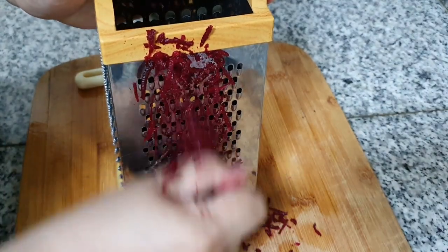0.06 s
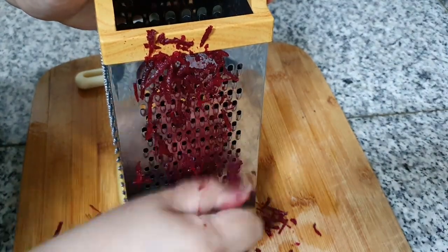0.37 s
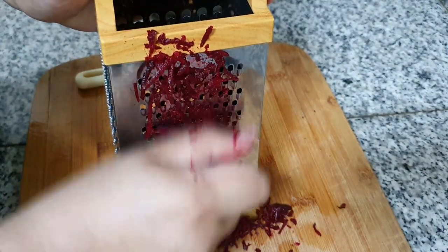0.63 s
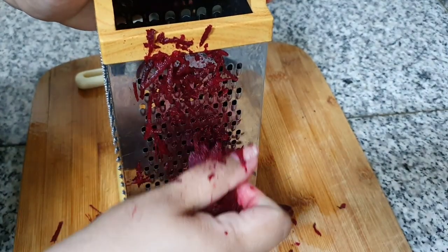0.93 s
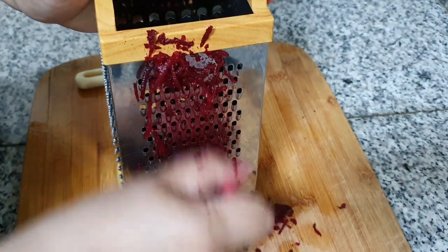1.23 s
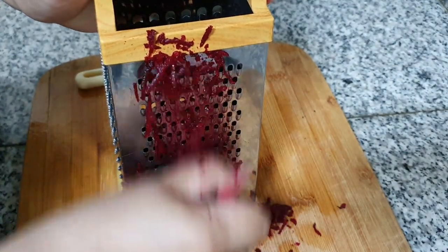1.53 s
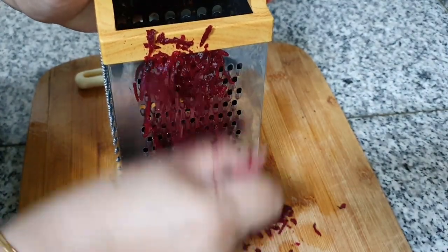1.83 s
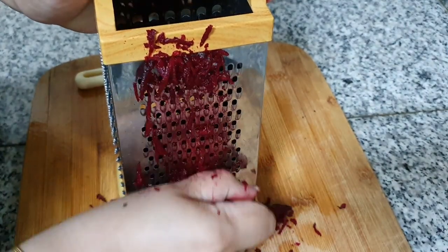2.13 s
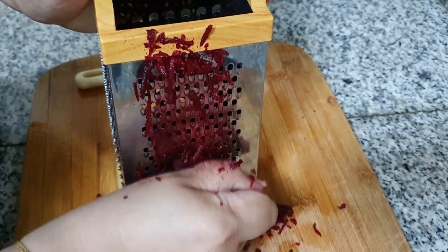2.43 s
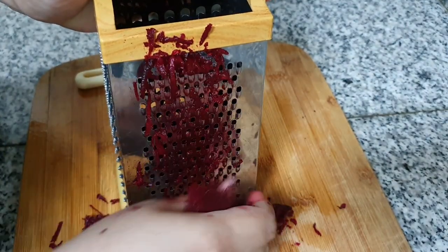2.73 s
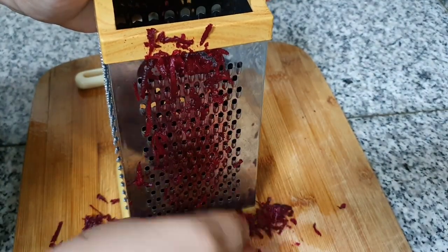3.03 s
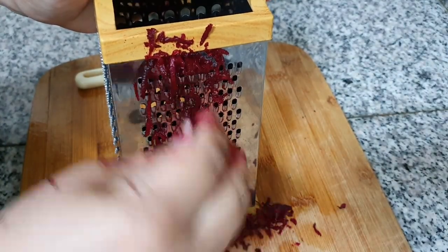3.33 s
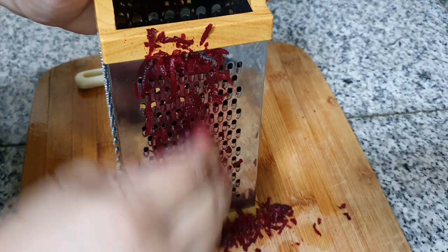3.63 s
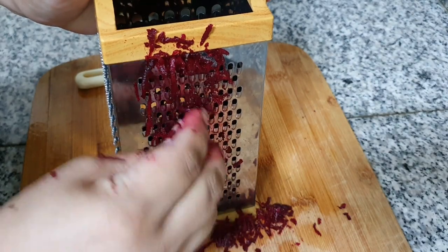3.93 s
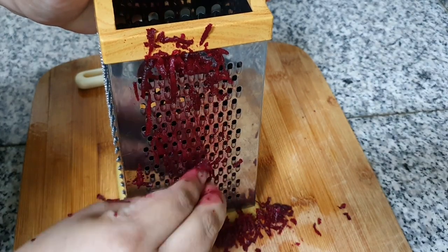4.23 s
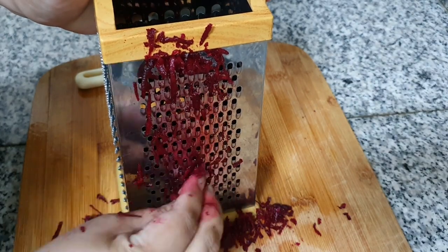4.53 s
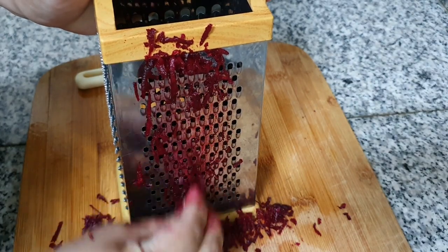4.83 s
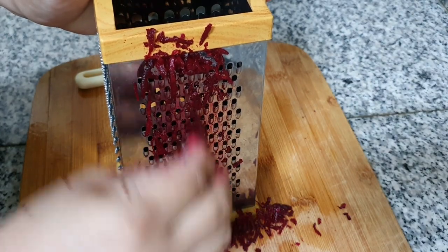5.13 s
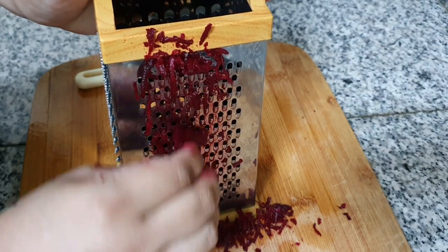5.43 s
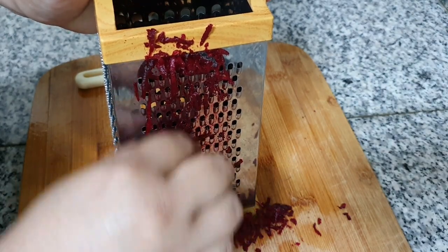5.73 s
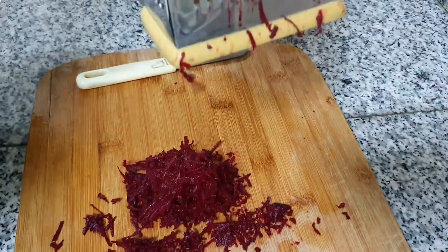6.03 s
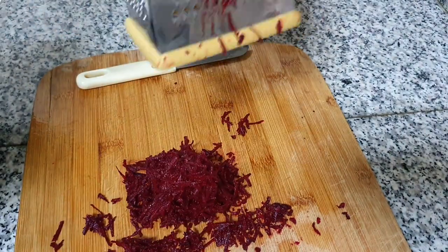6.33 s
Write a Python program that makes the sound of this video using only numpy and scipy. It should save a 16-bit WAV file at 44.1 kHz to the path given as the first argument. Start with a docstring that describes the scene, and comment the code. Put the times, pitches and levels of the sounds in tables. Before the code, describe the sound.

Close by in a small kitchen, raw beetroot is rubbed quickly over a steel box grater in four bursts with brief pauses. Each stroke rasps and crunches wetly, ringing the hollow metal and thumping the wooden board beneath. The later bursts are softer and fade out. At the end, loose shreds rustle and the rim scrapes faintly as the grater is lifted, over a faint low room rumble.

```python
"""A small kitchen, close to a two-port microphone: raw beetroot is rubbed quickly over a steel box grater
on a wooden board, in four bursts. The teeth tear the flesh in dense little bites that ring the steel
walls and the hollow box and thump the board; juice squelches in the holes. Loose shreds rustle and the
rim scrapes as the grater is lifted. The room echoes briefly and rumbles faintly behind."""
import sys
import numpy as np
from scipy import signal
from scipy.fft import rfft, irfft
from scipy.io import wavfile

SR = 44100
rng = np.random.default_rng(int(sys.argv[2]) if len(sys.argv) > 2 else 0)


def unload_wav(signal):
    """Save mono or channel-first audio to the path in sys.argv[1] as 16-bit WAV at rate SR, clipped to [-1, 1]."""
    wavfile.write(
        sys.argv[1],
        SR,
        np.round(np.clip(np.atleast_2d(signal).T, -1, 1) * 32767).astype(np.int16),
    )


N = 285321
TIME_S = np.arange(N) / SR
RING_S = np.arange(16384) / SR
SCATTER_DB = 4  # sheet scatter re direct click

# steel walls, damped by hand and pulp: f/Hz, width/Hz, level/dB, left minus right/dB, left lead/rad
WALL_MODES = [(1137, 63, 2.5, 8, 2), (1286, 49, -1, 9, .5), (1345, 17, -5.5, 8.5, 1.66),
              (1537, 11, -34.5, 13.5, 3.6), (1977, 200, -8, 17, 0.28), (2080, 91, -11.5, 7, 2.4),
              (2440, 57, -8.5, 9, 1.5), (2752, 170, -5, 1, 1.6), (4100, 150, -13, 2, 1.6)]
# dry rasp spectrum: f/Hz, level/dB
RASP_SPECTRUM = [(300, -11), (700, -3.5), (1300, 1.5), (1750, -1.5), (2300, 3), (3400, -3.5), (4500, -3),
                 (6500, -11), (9000, -40.5)]
# wet crunch spectrum: f/Hz, level/dB
CRUNCH_SPECTRUM = [(1500, -33), (3300, -3), (5200, -1), (6500, -2), (7700, -14.5), (9800, -7.5),
                   (15500, -12)]


def grating():
    """Each cut rasps, crunches and squelches; within a burst a lighter slide back follows it."""
    # cutting strokes, about ten a second: t/s, length/s, force/dB
    strokes = [(0, 0.0097, -30.5), (0.046, 0.017, -25.5), (0.134, 0.043, -27), (0.228, 0.027, -27),
               (0.322, 0.039, -25.5), (.43, 0.026, -25.5), (0.525, 0.025, -27), (.617, 0.025, -32.5),
               (1.013, 0.027, -28.5), (1.111, 0.025, -25), (1.202, 0.039, -26), (1.304, 0.035, -25.5),
               (1.407, 0.029, -24.5), (1.504, 0.032, -25), (1.599, .039, -27.5), (1.713, .027, -25),
               (1.806, 0.039, -28.5), (1.901, 0.045, -28), (2.011, .027, -26), (2.109, 0.024, -25.5),
               (2.201, 0.026, -27), (2.293, 0.042, -29.5), (2.397, 0.036, -30), (2.502, 0.023, -30),
               (2.583, 0.039, -32.5), (3.358, .023, -38.5), (3.454, 0.024, -30), (3.549, 0.029, -28.5),
               (3.642, 0.039, -29.5), (3.735, .045, -31), (3.849, 0.0181, -29), (3.941, 0.027, -34),
               (4.196, 0.0235, -35), (4.291, .044, -32.5), (4.395, 0.032, -31.5), (4.498, 0.027, -32),
               (4.592, .041, -31.5), (4.692, 0.035, -32), (4.787, 0.036, -33), (4.877, 0.04, -36),
               (4.973, 0.038, -41.5), (5.064, 0.049, -39), (5.135, 0.1, -40.5), (5.251, 0.032, -36),
               (5.317, 0.015, -47), (5.356, 0.0214, -39.5)]
    # how the hand bears on the grater: t/s, box re force/dB, board re force/dB
    bearing = [(.1, -5, -1), (.42, -13, -6.5), (.6, 2, 6), (1.02, -7, -2.5), (1.21, -4.5, 2), (1.31, -7, 3),
               (1.45, -4.5, -7), (1.6, -9, 2.5), (1.72, -5.5, -3.5), (2.1, -6, -6), (2.2, -3.5, 3),
               (2.55, -5.5, -3), (3.48, 0.5, -2.5), (3.8, -7, -0.5), (4.18, 1.5, 1), (4.34, -10, -5.5),
               (4.85, -11.5, -2.5), (5.14, -11, 10.5), (5.27, -7.5, -1)]
    start_s, length_s, force_db = np.transpose(strokes)
    bearing_s, box_db, board_db = np.transpose(bearing)
    box_db = force_db + np.interp(start_s, bearing_s, box_db)
    board_db = force_db + np.interp(start_s, bearing_s, board_db)
    # the beet is turned to a dry face, which crunches less until juice soaks through
    turn_s, soak_s, dry_db = 2.81, 0.56, -22
    dryness = (start_s > turn_s - .2) * np.exp(-np.maximum(start_s - turn_s, 0) / soak_s)
    firm_db, firm_wet_db = -27.5, -34.5
    wet_db = firm_wet_db + 0.78 * (force_db - firm_db) + dry_db * dryness
    back_db = -7 + 0.34 * (wet_db - force_db)  # juice drags on the slide back
    slides = np.diff(start_s, append=np.inf) < .15

    def force(level_db, slide_db=0):
        """Envelope of the cuts and slides back."""
        cut = pressure(start_s, length_s, level_db, rise_s=0.0054, fall_s=0.0068, arch_db=3.5)
        span_s = length_s[slides]
        back = pressure(start_s[slides] + span_s + 0.02, 0.53 * span_s + 0.012,
                        (level_db + back_db)[slides] + slide_db, rise_s=0.011, fall_s=0.01)
        return cut + back

    teeth = bites(rate_hz=2200, spread_db=1)
    wet = force(wet_db)
    walls = steel_walls(teeth * force(force_db, slide_db=-8.5), wander_db=5.5, moves_per_s=18)
    rasp = undb(-2.5) * crack(teeth * force(force_db), RASP_SPECTRUM, SCATTER_DB, t60_s=0.031)
    crunch = undb([[2.5], [.5]]) * crack(teeth * wet, CRUNCH_SPECTRUM, scatter_db=17, t60_s=0.019)
    squelch = undb(-3.5) * juice(wet, count=2200, low_hz=1780, high_hz=6700, t60_s=0.018)
    box = undb(-4) * hollow_box(teeth, force(box_db))
    return walls + rasp + crunch + squelch + box + board(start_s, length_s, board_db)


def steel_walls(clicks, wander_db, moves_per_s):
    """The walls ring; each mode swells or fades with the place where the beet touches."""
    # how freely the walls ring under beet and hand: t/s, level/dB
    freedom = [(0, -13.5), (3.5, -11), (4.4, -6), (5.1, -16)]
    moves_s = np.arange(0, N / SR + 1, 1 / moves_per_s)
    out = 0
    for mode in WALL_MODES:
        reach_db = wander_db * np.interp(TIME_S, moves_s, rng.standard_normal(1024)[:len(moves_s)])
        out = out + ring(clicks * undb(mode[2] + reach_db), modes([mode])[:, :2048])
    return undb(np.interp(TIME_S, *np.transpose(freedom))) * out


def juice(force, count, low_hz, high_hz, t60_s):
    """Juice squelches in the holes: tiny pops, each with its own pitch, size and side."""
    out = np.zeros((2, N))
    t = RING_S[:1024]
    for place, pitch, size, side in rng.random((count, 4)):
        at = int(place * (N - len(t)))
        hz = low_hz * (high_hz / low_hz) ** pitch
        pop = np.sin(2 * np.pi * hz * t) * np.exp(-np.log(1000) * t / t60_s)
        gain = force[at] * np.sqrt(-np.log(1 - size))
        out[:, at:at + len(t)] += gain * np.sqrt([[side], [1 - side]]) * pop
    return out


def hollow_box(teeth, force):
    """All four walls shake the air inside, so each port hears its own mix."""
    # air modes: f/Hz, width/Hz, level/dB, left minus right/dB, left lead/rad
    air_modes = [(323.5, 48.5, 0.5, 6.5, 0.8), (460, 194, -6.5, 7.5, -0.068), (650, 91, -8, -9, 0.031),
                 (919, 57, 2.5, -2, -1.85)]
    shaking = np.array([bites(rate_hz=1400, spread_db=1) for port in range(2)]) + undb(4) * teeth
    return ring(shaking * force, colour(modes(air_modes), [(1500, 0), (8000, -14)]))


def board(start_s, length_s, level_db):
    """The hand jerks as the teeth catch and again as they let go; the board shudders in between."""
    # board on the counter: f/Hz, width/Hz, level/dB, left minus right/dB, left lead/rad
    board_modes = [(80, 22, 1, -0.097, 0), (142.3, 31, -1, -1, 0.041)]
    jerks = np.zeros(N)
    jitter_s = 0.003 * rng.standard_normal((len(start_s), 2))
    for t, span_s, gain, (catch_s, release_s) in zip(start_s, length_s, undb(level_db), jitter_s):
        jerks[int(abs(t + .008 + catch_s) * SR)] += 0.86 * gain
        jerks[int(abs(t + .85 * span_s + release_s) * SR)] -= gain
    force = pressure(start_s + 0.0024, length_s + 0.015, level_db, rise_s=0.013, fall_s=0.013)
    shudder = rng.standard_normal(N) * force
    rolloff = [(25, 1.5), (60, 2.5), (190, -3), (260, -12.5), (800, -26.5), (3000, -59.5)]
    return ring(undb(25.5) * jerks + undb(-4.5) * shudder, unit(colour(modes(board_modes), rolloff)))


def handling():
    """Snapping fibres, brushing shreds and dull knocks of the grater."""
    # fingers and loose shreds on the steel: t/s, length/s, level/dB
    brushes = [(0.778, 0.046, -54.5), (0.947, 0.062, -45.5), (3.965, 0.018, -48), (4.133, 0.013, -49),
               (5.388, 0.022, -53.5), (5.692, 0.12, -53), (6.033, 0.038, -69.5)]
    # single fibres snapping on a tooth: t/s, level/dB
    snaps = [(1.025, -27), (1.336, -20), (2.521, -20.5), (3.476, -28.5), (3.559, -25), (3.653, -27),
             (4.849, -27)]
    # grater knocking on the board: t/s, level/dB
    knocks = [(0.78, -54), (3.143, -32), (4.85, -25.5), (5.722, -41), (6.23, -51.5)]
    # dull knock: f/Hz, level/dB
    knock_spectrum = [(150, 8.5), (450, -8.5), (1250, -0.5), (2000, -30.5), (5200, -19), (9000, -57.5)]
    force = pressure(*np.transpose(brushes), rise_s=0.004, fall_s=0.045)
    clicks = bites(rate_hz=290, spread_db=0) * force + taps(snaps)
    rasp = undb(-3.5) * crack(clicks, RASP_SPECTRUM, SCATTER_DB, t60_s=0.026)
    crunch = undb(-17) * crack(clicks, CRUNCH_SPECTRUM, SCATTER_DB, t60_s=0.012)
    walls = undb(-11) * ring(clicks, modes(WALL_MODES))
    return rasp + crunch + walls + crack(taps(knocks), knock_spectrum, scatter_db=6.5, t60_s=0.038)


def rim_scrape():
    """The rim scrapes on lifting and stirs the wall modes from about 2 to 3 kHz."""
    # rim contact: t/s, length/s, level/dB
    scrapes = [(5.782, 0.051, -57.5)]
    force = pressure(*np.transpose(scrapes), rise_s=0.008, fall_s=0.015)
    stirred = [mode for mode in WALL_MODES if 1900 < mode[0] < 3000]
    return ring(bites(rate_hz=1800, spread_db=0.5) * force, modes(stirred))


def room_echo(near, t60_s, build_s):
    """Dense decaying reflections off the kitchen walls, unrelated at the two ports."""
    tail = unit(rng.standard_normal((2, len(RING_S))) * np.exp(-np.log(1000) * RING_S / t60_s))
    tail *= 1 - np.exp(-RING_S / build_s)
    return ring(near, colour(tail, [(100, -16.5), (1500, 0.5), (14000, -6)]))


def room_rumble():
    """Low rumble, alike at both ports, with a faint hiss that differs between them."""
    # kitchen background: f/Hz, level/dB
    spectrum = [(25, -24.5), (49, 0), (65, -6), (130, -2.5), (300, -21.5), (550, -26.5), (1000, -39.5),
                (2600, -51), (4200, -58.5), (5200, -44.5), (7500, -69), (10000, -66)]
    mid, side = colour(rng.standard_normal((2, N)), spectrum)
    side = colour(side, [(150, -19), (2000, 3)])
    return (mid + np.array([[1], [-1]]) * side) / np.std(mid)


def bites(rate_hz, spread_db):
    """Teeth tearing cells: random clicks, many small and a few large, rms 1."""
    chance, size, sign = rng.random(N), rng.exponential(size=N), rng.choice([-1, 1], N)
    clicks = (chance < rate_hz / SR) * sign * undb(spread_db * np.minimum(size, 4))
    return clicks / np.std(clicks)


def pressure(starts_s, lengths_s, levels_db, rise_s, fall_s, arch_db=0):
    """Contact force: builds at each start, arches by arch_db, then lets go."""
    power = np.zeros(N)
    for start_s, length_s, db in zip(starts_s, lengths_s, levels_db):
        near = slice(max(int((start_s - .05) * SR), 0), int((start_s + length_s + .1) * SR))
        t = TIME_S[near] - start_s
        shape = (.5 + .5 * np.tanh(t / rise_s)) * np.exp(-np.maximum(t - length_s, 0) / fall_s)
        arch = np.sin(np.pi * np.clip(t / length_s, 0, 1) ** 0.97) - .5
        power[near] += (undb(db + arch_db * arch) * shape) ** 2
    return np.sqrt(power)


def taps(table):
    """One impulse per (t/s, level/dB) row; level is rms over 3 ms."""
    out = np.zeros(N)
    for t, db in table:
        out[int(t * SR)] = undb(db) * np.sqrt(.003 * SR)
    return out


def crack(clicks, spectrum, scatter_db, t60_s, lag_samples=5):
    """Each click reaches the left port first, then scatters in the perforated sheet."""
    pole = np.exp(-2 * np.log(1000) / (t60_s * SR))
    energy = signal.lfilter([1 - pole], [1, -pole], clicks ** 2 + 1e-18)
    direct = np.array([clicks, np.roll(clicks, lag_samples)])
    scatter = undb(scatter_db) * np.sqrt(energy) * rng.standard_normal((2, N))
    filter_gain = np.linalg.norm(colour(signal.unit_impulse(len(RING_S)), spectrum))
    return colour(direct + scatter, spectrum) / (filter_gain * np.hypot(1, undb(scatter_db)))


def modes(table):
    """Damped sines; each reaches the two ports with its own strength and phase."""
    side, out = np.array([[.5], [-.5]]), 0
    for hz, width_hz, db, pan_db, lead_rad in table:
        decay = np.sqrt(width_hz) * np.exp(-np.pi * width_hz * RING_S)
        out = out + undb(db + side * pan_db) * decay * np.cos(2 * np.pi * hz * RING_S + side * lead_rad)
    return unit(out)


def colour(x, spectrum):
    """Minimum-phase filter from (f/Hz, level/dB) points; clicks keep their attack."""
    size = len(RING_S)
    hz, db = np.transpose(spectrum)
    gain = undb(np.interp(np.log(np.fft.rfftfreq(size, 1 / SR) + 1), np.log(hz), db))
    cepstrum = irfft(np.log(gain))
    cepstrum[1:size // 2] *= 2
    cepstrum[size // 2 + 1:] = 0
    response = irfft(np.exp(rfft(cepstrum)))
    return signal.oaconvolve(np.atleast_2d(x), response[None], axes=1)[:, :x.shape[-1]]


def ring(drive, response):
    """Drive convolved with a two-channel response."""
    return signal.oaconvolve(np.atleast_2d(drive), response, axes=1)[:, :N]


def unit(response):
    """Two-channel response scaled to unit noise gain."""
    return response / np.sqrt(np.sum(response ** 2) / 2)


def undb(db):
    """Decibels to gain."""
    return 10 ** (np.asarray(db) / 20)


def scene():
    """The grater close by, its short echo and the room's rumble."""
    near = grating() + handling() + rim_scrape()
    echo = undb(-7.5) * room_echo(near, t60_s=0.24, build_s=0.0062)
    return near + echo + undb(-46.5) * room_rumble()


def record(dry):
    """Steep low-pass in the top octave."""
    cutoff_hz = 15900
    return signal.sosfilt(signal.ellip(10, .2, 80, cutoff_hz, fs=SR, output="sos"), dry)


dry = scene()
out = record(dry)
unload_wav(out)
```